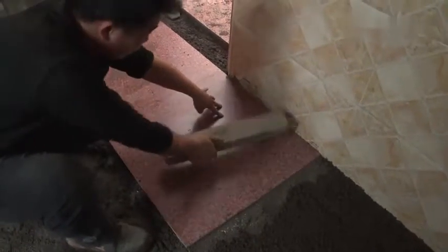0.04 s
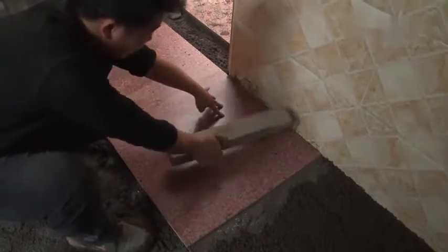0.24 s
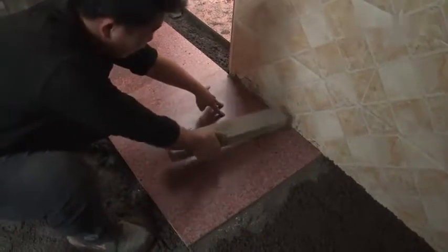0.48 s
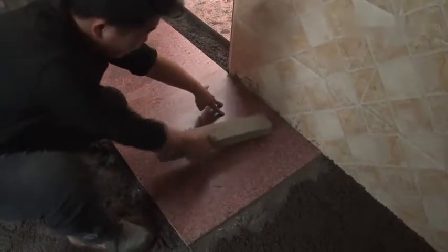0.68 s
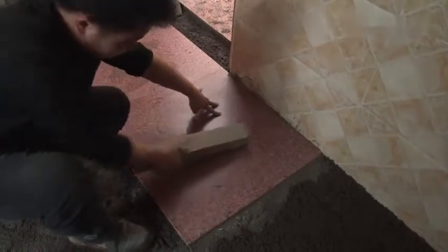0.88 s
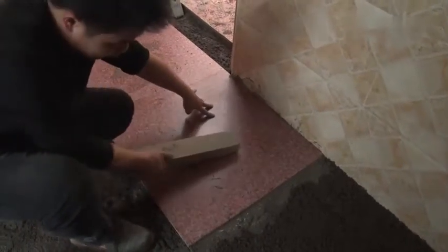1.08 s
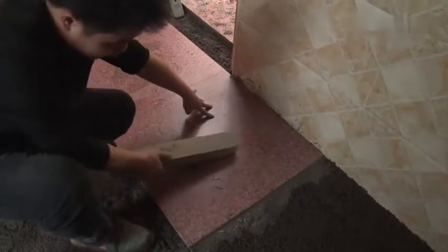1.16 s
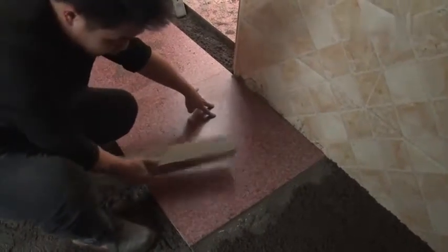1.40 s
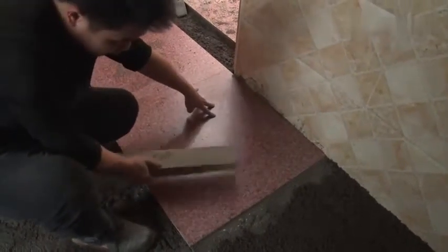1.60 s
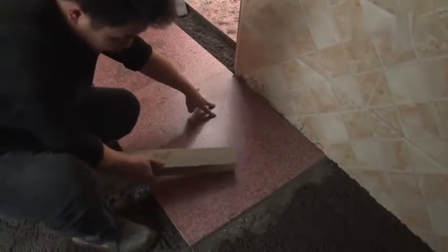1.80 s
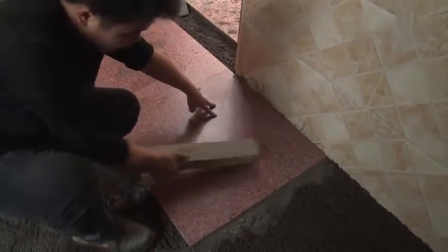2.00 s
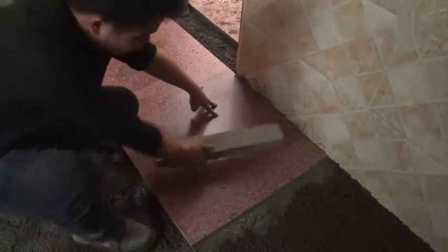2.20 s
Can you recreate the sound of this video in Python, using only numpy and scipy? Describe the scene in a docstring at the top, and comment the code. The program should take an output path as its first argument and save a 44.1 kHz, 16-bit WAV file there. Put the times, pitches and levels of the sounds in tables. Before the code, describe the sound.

In a bare, echoing room, a wooden block clacks three times on a tile straight ahead of the microphone. After a soft shuffle of cloth and shoe, it knocks twice more, with a faint low hum underneath.

```python
"""Bedding a floor tile

A bare, echoing room, in stereo. A tiler taps a tile into mortar with a wooden block: three knocks,
a shift of his crouch, two more. Each hollow clack reaches the microphone dead centre, then returns
dull from the far walls; a low tone lingers. The limiter ducks at each blow and lets the echo swell back."""
import sys
import numpy as np
from scipy import signal
from scipy.fft import rfft, irfft
from scipy.io import wavfile
from scipy.ndimage import minimum_filter1d

SR = 44100
rng = np.random.default_rng(int(sys.argv[2]) if len(sys.argv) > 2 else 0)


def output_pcm(signal):
    """Save a mono or channel-first signal as 16-bit PCM at the path in sys.argv[1].

    Samples are clipped to [-1, 1] before scaling.
    """
    pcm = np.clip(np.atleast_2d(signal).T, -1, 1) * 32767
    wavfile.write(sys.argv[1], SR, np.round(pcm).astype(np.int16))


N = 99225
T = np.arange(N) / SR
BIN_HZ = np.maximum(np.arange(N // 2 + 1) * SR / N, 1)

# stereo width of diffuse sound: f/Hz, side minus mid/dB
WIDTH = [(30, -1), (120, -72), (280, -46), (550, -19), (1100, -8.5), (2500, -11), (5000, -6), (11000, -3.5)]
# room tone: f/Hz, relative level/dB
ROOM_TONE_COLOUR = [(30, 6), (70, 13), (130, 8.5), (300, 6), (600, -3.5), (1200, -3.5), (2100, -9),
                    (2800, -9.5), (5000, -14), (11000, -33.5)]
# lingering low tone: t/s, level/dB
LOW_TONE_LEVEL = [(0, -45), (.12, -49), (.4, -34), (.85, -37.5), (1.15, -37.5), (1.48, -41), (1.75, -36),
                  (2.25, -48.5)]
# blows: t/s, then level/dB of thud, hollow note, clack, clink, crack, gritty tick, note aimed at the mic
KNOCKS = [(0.1215, -0.5, -3, -3, 0.5, -3, 0, -7.5), (0.3476, -0.5, -2.5, -2, -2.5, -5.5, -4.5, -4),
          (0.5459, -3, -3.5, -3.5, 4.5, -6, -3, -6.5), (1.4965, -1.5, -2, -12.5, -4.5, -18.5, -7.5, -55),
          (1.7114, -4, -4.5, -4, -0.5, -13, -0.5, -32)]
# where thud, hollow note, clack, clink and crack lie: f/Hz
PART_HZ = (400, 752, 1400, 1920, 2650)
# modes of the block on the bedded tile: f/Hz, level/dB, t60/s
BLOCK_MODES = [(174, -5.5, 0.039), (315, -4, 0.022), (605, 2, 0.0091), (754.8, -5.5, 0.089),
               (936, 3, 0.0073), (1201, 4, 0.011), (1358, 2.5, 0.027), (1521, 5, 0.0087),
               (1854, 0.5, 0.013), (1863, -2.5, 0.025), (2480, -5.5, 0.0026), (3232, -11.5, 0.0049),
               (3472, 3, 0.002), (4320, -6, 0.0024)]
# modes of the glaze at the point of contact: f/Hz, level/dB, t60/s
GLAZE_MODES = [(4850, -13, 0.0029), (7100, -7.5, 0.0017), (8290, -6.5, 0.0016), (8800, -11, 0.0022),
               (10190, -16, 0.0018)]
# crunch of mortar: f/Hz, relative level/dB
MORTAR_COLOUR = [(2000, 6.5), (4000, 14), (5400, 9), (7000, 9.5), (9000, 10.5), (12000, -28)]
# modes of the free part of the tile: f/Hz, level/dB, t60/s
TILE_MODES = [(1916, -37, 0.85), (1910, -38.5, 0.56), (3314, -46.5, 0.81), (3345, -45, 0.68),
              (3500, -51, 0.58)]
# hollow note back from the far walls: f/Hz, level/dB, t60/s
RETURNING_MODES = [(748.7, -16.5, 0.57), (790, -20.5, 0.46)]
# standing waves of the room: f/Hz, level/dB, t60/s
ROOM_MODES = [(99.7, -38.5, 3), (168.8, -29, 1.6), (195.6, -22, 1.227), (251.2, -25.5, 1.05),
              (296, -22, 1.28), (357.4, -22, 0.86), (418.4, -26, 0.9), (572.3, -15, 0.23),
              (1239, -23, 0.72), (1344, -17, 0.47), (1434, -35, 1), (1870, -52, .6)]
# diffuse echo against the direct sound: f/Hz, level/dB
ECHO_COLOUR = [(60, -5.5), (150, 7.5), (400, 5), (750, 4), (1400, 0.5), (2300, 6), (3500, -6.5),
               (6000, -9.5), (11000, -12.5)]
# decay of the echo: f/Hz, t60/s
ECHO_T60 = [(100, 0.97), (300, 1.063), (750, 0.75), (1500, 0.57), (3500, 0.78), (10000, 0.49)]
# clothes and a shoe sliding over the tile: t/s, level/dB
SLIDE_LEVEL = [(.45, -116), (.53, -42.5), (.6, -51), (.74, -55), (.83, -46), (.88, -49), (.94, -46),
               (1.01, -52.5), (1.07, -41), (1.12, -50), (1.16, -49.5), (1.24, -71), (1.45, -68.5)]
# their swish: f/Hz, relative level/dB
SLIDE_COLOUR = [(300, -0.5), (1200, -13), (1750, -2.5), (1920, 9), (2100, -8), (2700, -10), (5000, -4.5),
                (8000, -1.5), (12000, -5.5)]


def from_db(db):
    """Decibels to gain."""
    return 10 ** (np.asarray(db) / 20)


def rms_one(x):
    """Scale to unit rms."""
    return x / np.sqrt(np.mean(x ** 2) + 1e-20)


def at_hz(points, hz):
    """Read a table on a log-frequency axis."""
    f, values = np.transpose(points)
    return np.interp(np.log(hz), np.log(f), values)


def in_time(points):
    """Read a curve at every sample."""
    return np.interp(T, *np.transpose(points))


def dying(t60):
    """Envelope that loses 60 dB in t60 seconds."""
    return from_db(-60 * T / t60)


def mode(hz, db, t60):
    """One dying sine."""
    return from_db(db) * np.sin(2 * np.pi * hz * T) * dying(t60)


def filtered(x, hz, kind):
    """Second-order Butterworth filter."""
    return signal.sosfilt(signal.butter(2, hz, kind, fs=SR, output="sos"), x)


def convolved(x, response):
    """Play x through a response."""
    return signal.fftconvolve(np.atleast_2d(x), np.atleast_2d(response), axes=1)[:, :N]


def blows(levels_db):
    """One click for each knock."""
    clicks = np.zeros(N)
    clicks[(np.array(KNOCKS)[:, 0] * SR).astype(int)] = from_db(levels_db)
    return clicks


def diffuse(colour):
    """Coloured stereo noise, wide in the treble and the deepest bass."""
    mid, side = rfft(rng.standard_normal((2, N)))
    side = side * from_db(at_hz(WIDTH, BIN_HZ))
    return irfft(from_db(at_hz(colour, BIN_HZ)) * np.array([mid + side, mid - side]), N)


def room_tone(db=-52):
    """Steady air all round the microphone."""
    return from_db(db) * rms_one(diffuse(ROOM_TONE_COLOUR))


def low_tone(hz=111.8):
    """A low tone lingers in the room, swelling and fading."""
    return from_db(in_time(LOW_TONE_LEVEL)) * rms_one(np.sin(2 * np.pi * hz * T))


def struck_modes(modes):
    """Every knock rings each mode, as strongly as it excites that part of the spectrum."""
    out = 0
    for k, (hz, db, t60) in enumerate(modes):
        strengths_db = [np.interp(np.log(hz), np.log(PART_HZ), knock[1:-2]) for knock in KNOCKS]
        out = out + (-1) ** k * convolved(blows(strengths_db), mode(hz, db, t60))
    return out


def gritty_tick(grit_db=-22.5, grit_t60_s=0.049, width_share=0.52):
    """Hard contact on the glaze, then a brief crunch of mortar under the tile."""
    clicks = blows(np.array(KNOCKS)[:, -2])
    glaze = sum((-1) ** k * mode(*row) for k, row in enumerate(GLAZE_MODES))
    grit = diffuse(MORTAR_COLOUR)
    grit = rms_one(width_share * grit + (1 - width_share) * grit.mean(axis=0))
    crunch = from_db(grit_db) * grit * convolved(clicks, dying(grit_t60_s))
    return convolved(clicks, glaze) + crunch


def tile_ring():
    """The free part of the tile rings on faintly, alike for every knock."""
    return convolved(blows(np.zeros(len(KNOCKS))), sum(mode(*row) for row in TILE_MODES))


def hollow_note(hz=748.3, hold_s=0.032, t60_s=0.09):
    """The block's note holds and dies; from some positions it goes straight to the microphone."""
    envelope = np.interp(T - hold_s, T, dying(t60_s))
    return convolved(blows(np.array(KNOCKS)[:, -1]), -np.sin(2 * np.pi * hz * T) * envelope)


def room_echo(knocks, build_s=0.004, bands=16):
    """The bare room's dense echo builds quickly and dies sooner in the treble."""
    spectrum = rfft(diffuse(ECHO_COLOUR))
    centres_hz = np.geomspace(70, 12000, bands)
    response = 0
    for hz, pick in zip(centres_hz, np.eye(bands)):
        envelope = dying(at_hz(ECHO_T60, hz)) * (1 - np.exp(-T / build_s))
        band = irfft(spectrum * np.interp(np.log(BIN_HZ), np.log(centres_hz), pick), N)
        response = response + band * envelope / np.linalg.norm(envelope)
    return convolved(knocks, response)


def far_walls(knocks, delay_s=0.073, t60_s=0.62, gain_db=-5, cutoff_hz=2280):
    """From across the room come a dull, smeared copy of each knock and its hollow note."""
    envelope = np.interp(T - delay_s, T, dying(t60_s), left=0)
    white = rms_one(diffuse([(1, 0)]))
    reflections = filtered(white * envelope / np.linalg.norm(envelope), cutoff_hz, "low")
    returning_note = np.interp(T - delay_s, T, struck_modes(RETURNING_MODES)[0], left=0)
    return from_db(gain_db) * convolved(knocks, reflections) + returning_note


def crouch_shift(flutter_db=1.5, flutter_below_hz=250):
    """Down at the floor, cloth and a shoe slide with a soft, uneven swish."""
    flutter = rms_one(filtered(rng.standard_normal(N), flutter_below_hz, "low"))
    return rms_one(diffuse(SLIDE_COLOUR)) * from_db(in_time(SLIDE_LEVEL) + flutter_db * flutter)


def scene(low_cut_hz=76):
    """At the microphone: room tone, the knocks and the room's answer, the tiler's shuffle."""
    background = room_tone() + low_tone()
    knocks = struck_modes(BLOCK_MODES) + gritty_tick()
    direct = knocks + tile_ring() + hollow_note()
    room = struck_modes(ROOM_MODES) + room_echo(knocks) + far_walls(knocks)
    in_room = filtered(filtered(direct + room, low_cut_hz, "high"), low_cut_hz, "high")
    return background + in_room + crouch_shift()


def record(dry, limit_db=-3, attack_s=0.0004, hold_s=0.037, release_db_per_s=184):
    """The recorder's limiter ducks, holds and recovers; peaks are soft-clipped and the top is cut."""
    ceiling, cutoff_hz = 0.92, 11900
    over_db = np.maximum(20 * np.log10(np.abs(dry).max(axis=0) + 1e-9) - limit_db, 0)
    half_hold = int(hold_s * SR / 2)
    held_db = -minimum_filter1d(-over_db, 2 * half_hold + 1, origin=half_hold, mode="nearest")
    duck_db = np.maximum.accumulate(held_db + release_db_per_s * T) - release_db_per_s * T
    attack_pole = np.exp(-1 / (attack_s * SR))
    limited = dry * from_db(-signal.lfilter([1 - attack_pole], [1, -attack_pole], duck_db))
    clipped = limited / (1 + (limited / ceiling) ** 4) ** (1 / 4)
    return signal.sosfilt(signal.ellip(10, .2, 80, cutoff_hz, fs=SR, output="sos"), clipped)


dry = scene()
out = record(dry)
output_pcm(out)
```